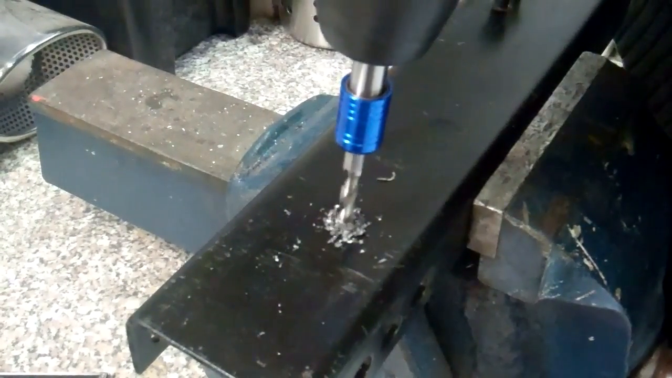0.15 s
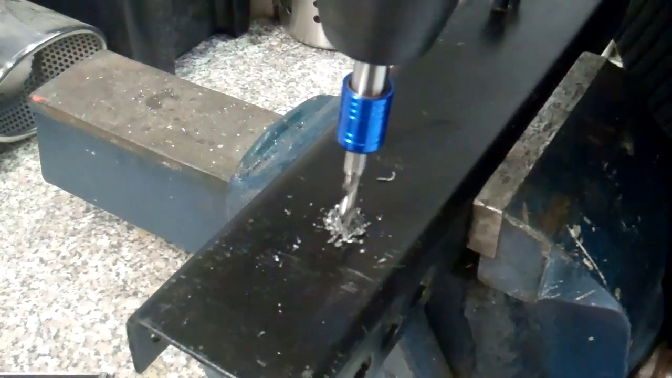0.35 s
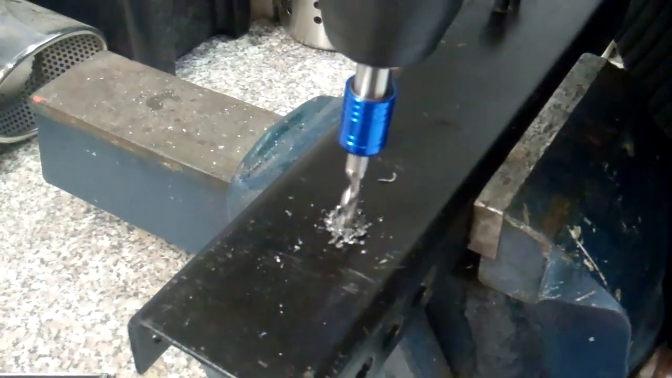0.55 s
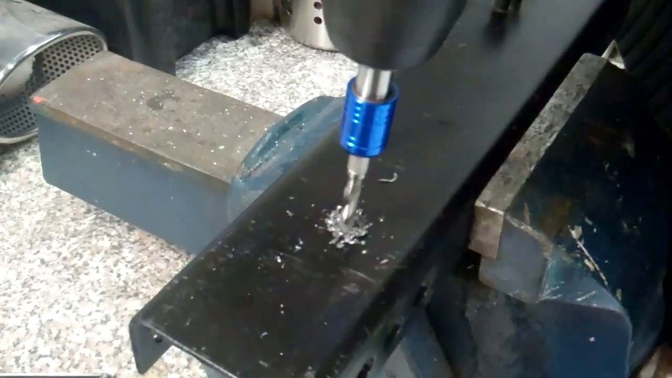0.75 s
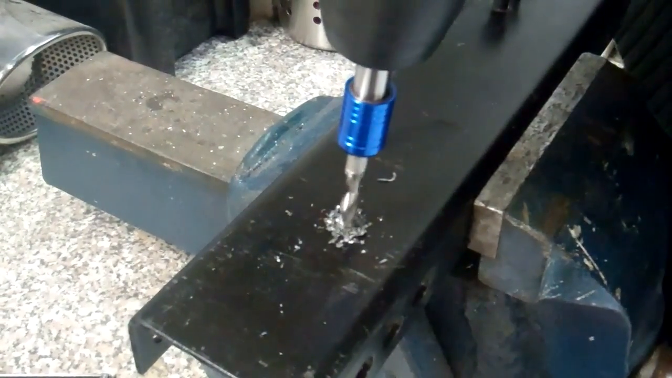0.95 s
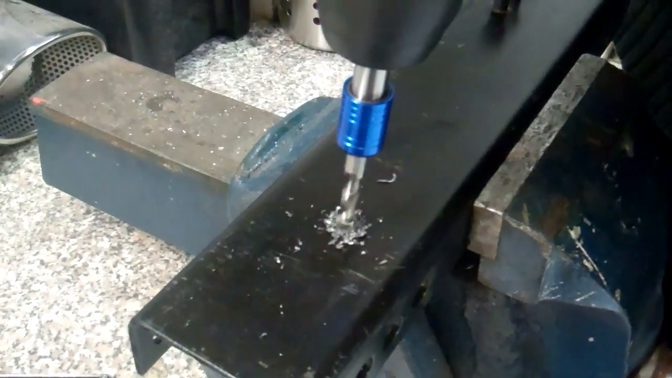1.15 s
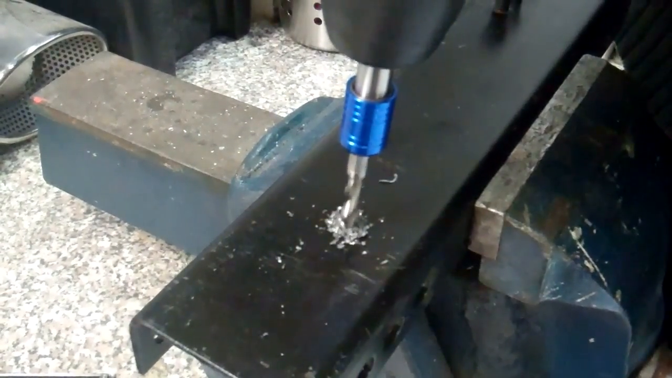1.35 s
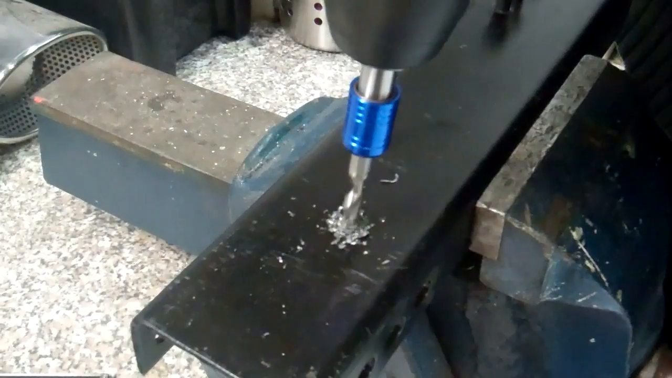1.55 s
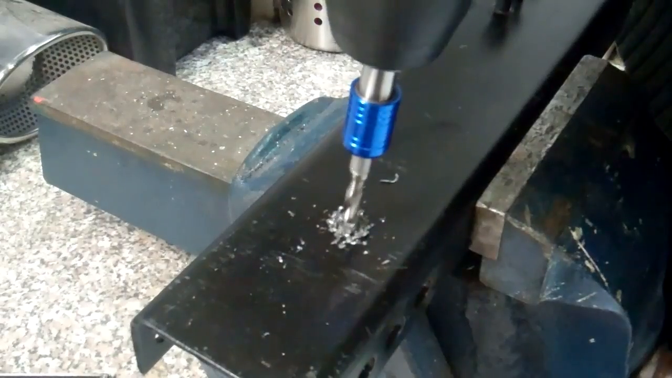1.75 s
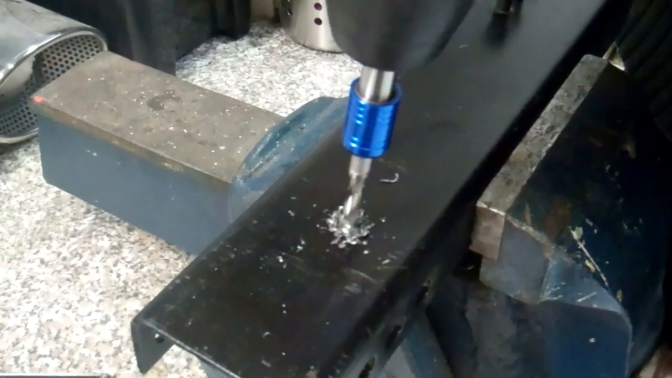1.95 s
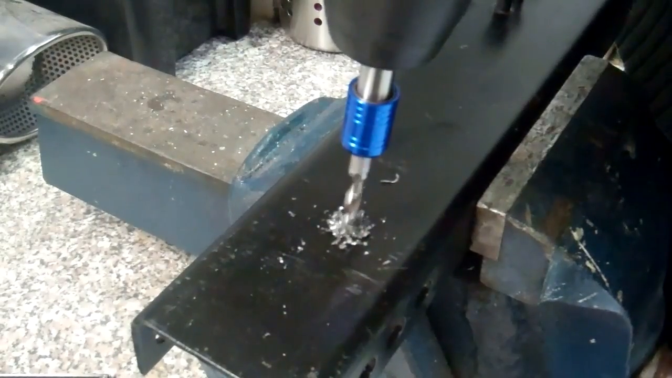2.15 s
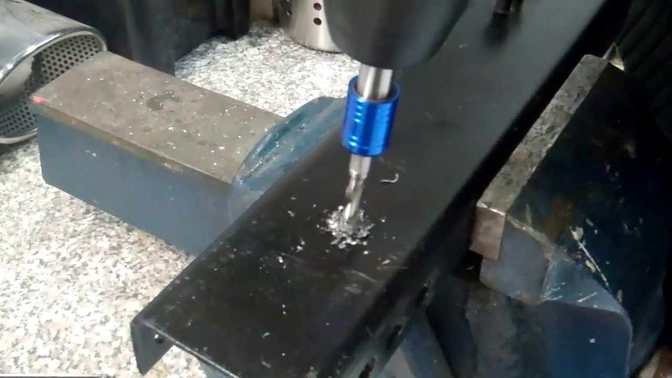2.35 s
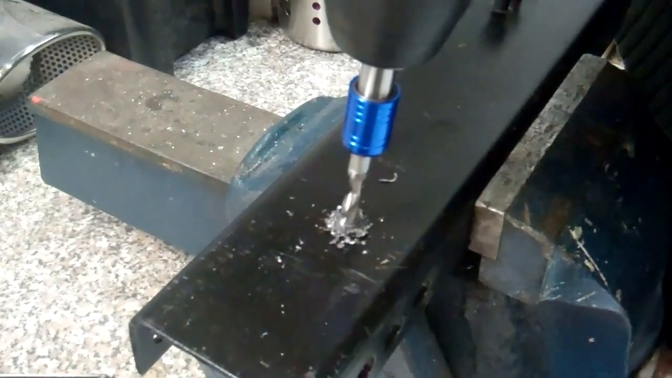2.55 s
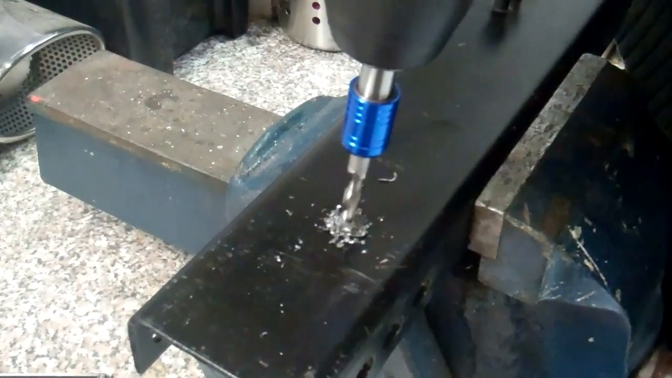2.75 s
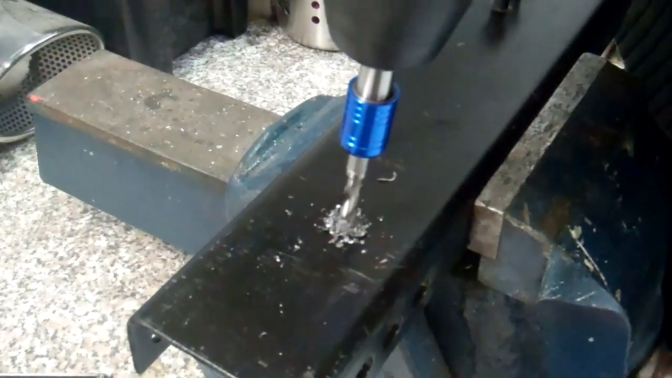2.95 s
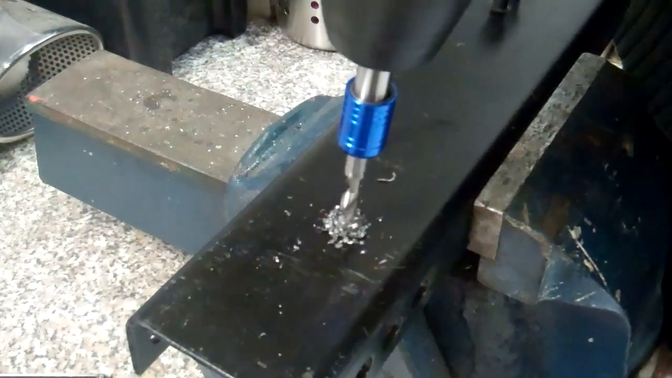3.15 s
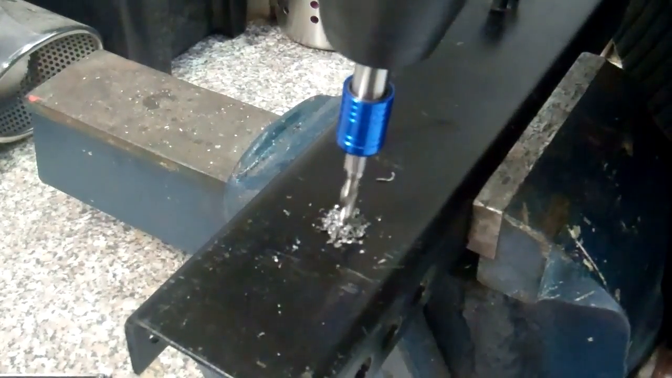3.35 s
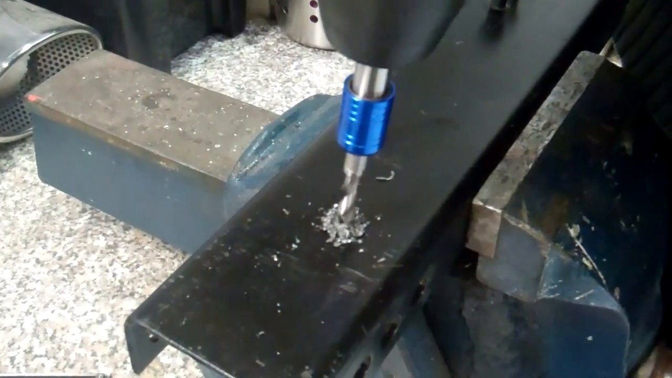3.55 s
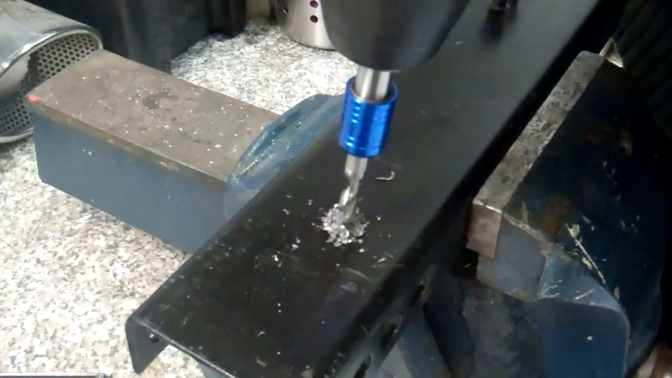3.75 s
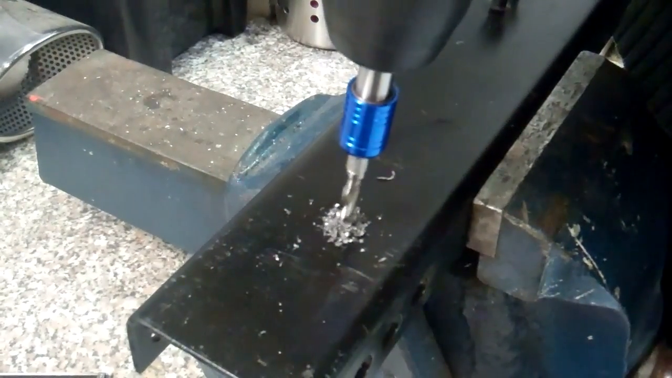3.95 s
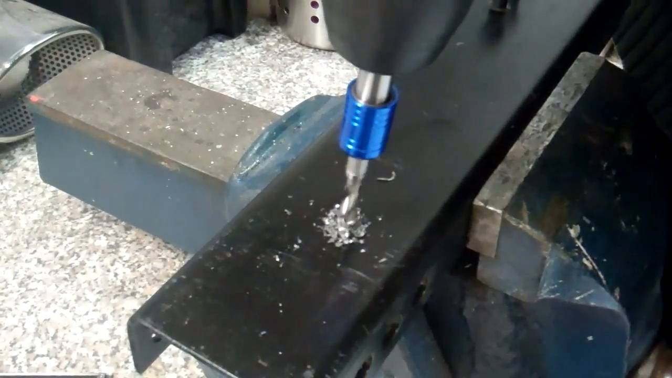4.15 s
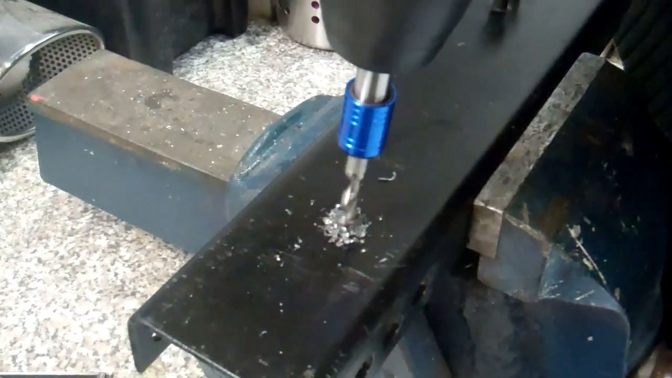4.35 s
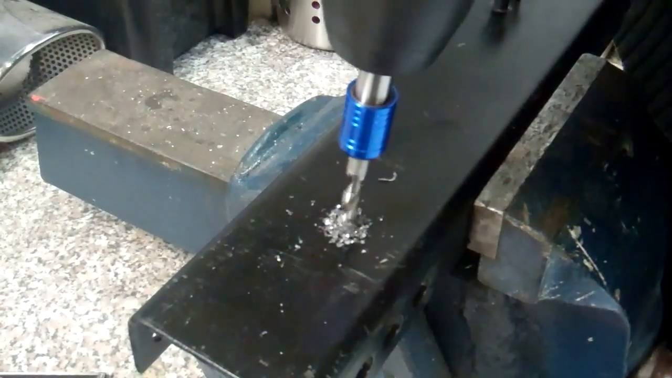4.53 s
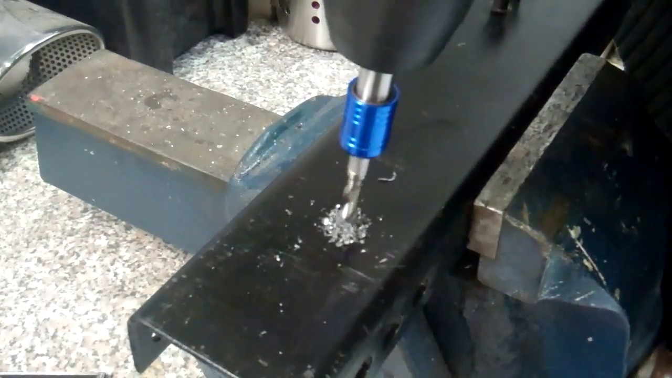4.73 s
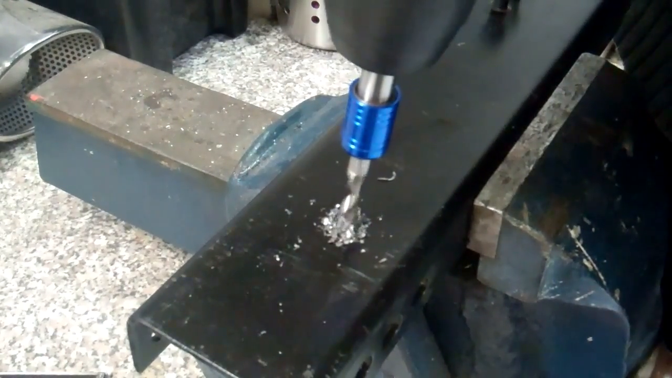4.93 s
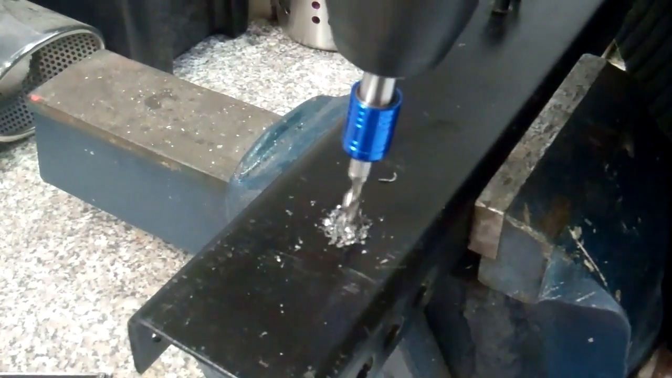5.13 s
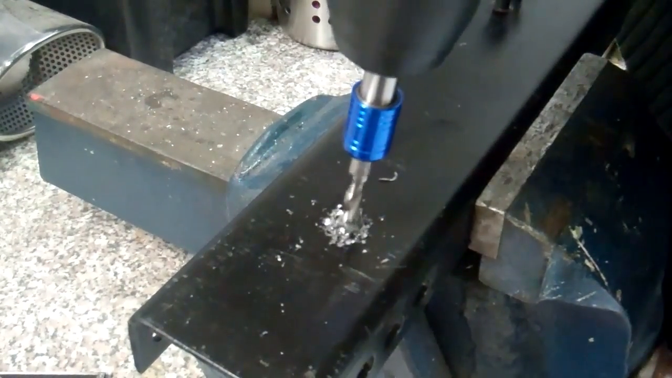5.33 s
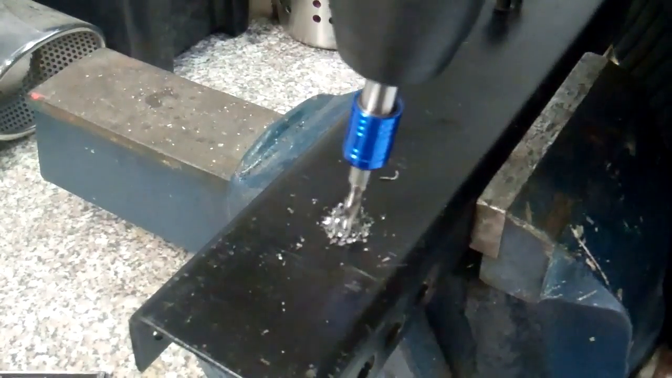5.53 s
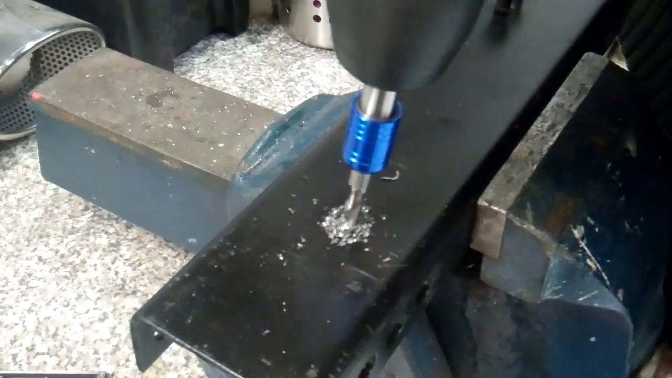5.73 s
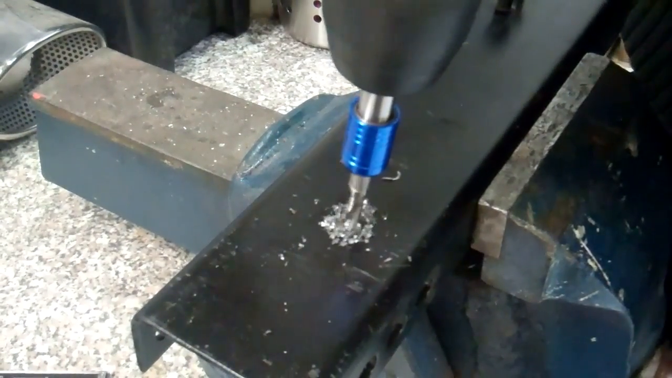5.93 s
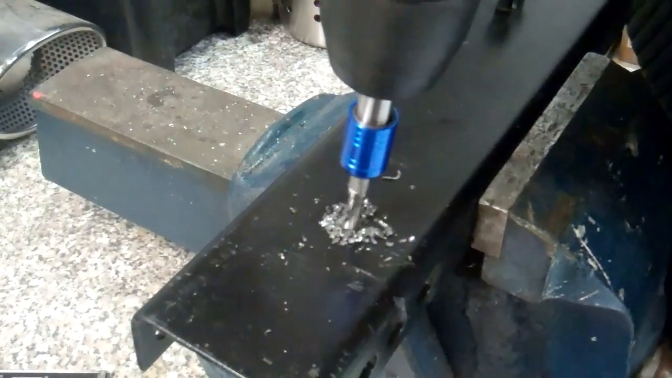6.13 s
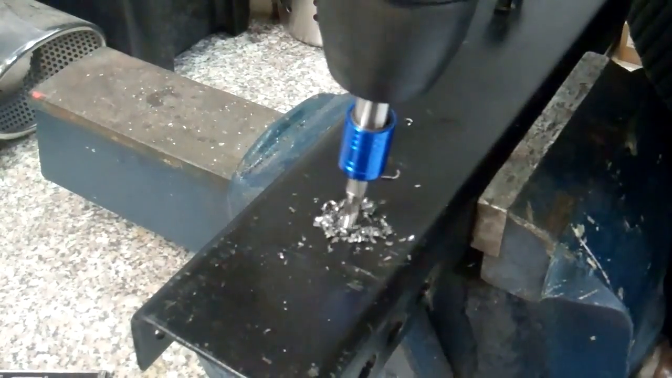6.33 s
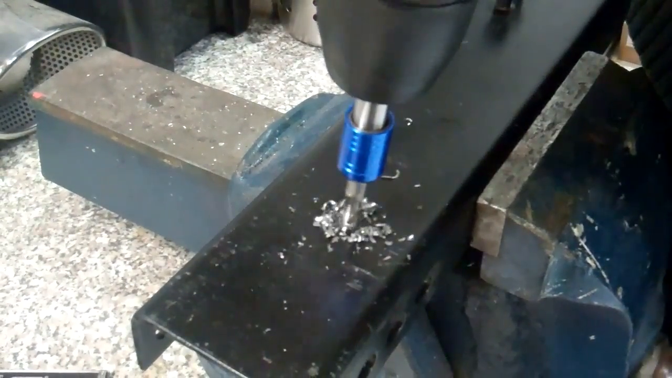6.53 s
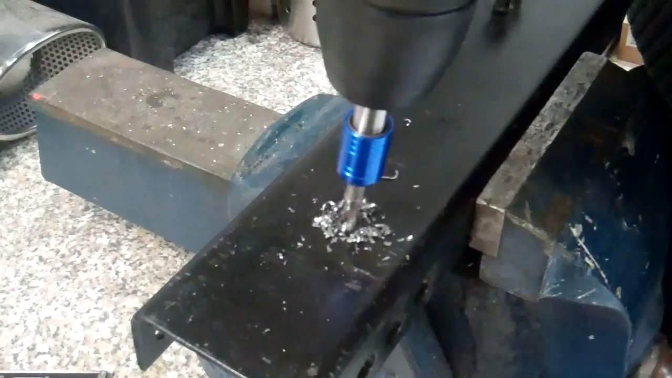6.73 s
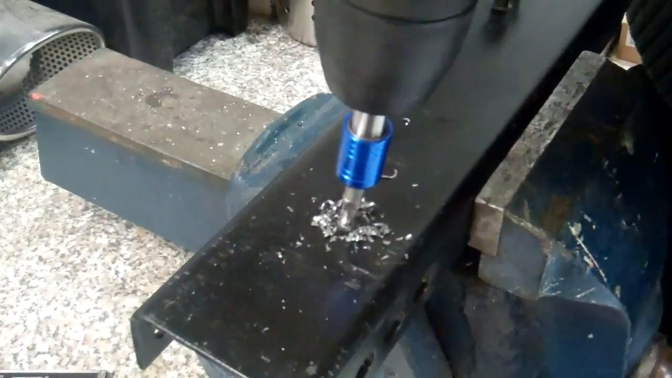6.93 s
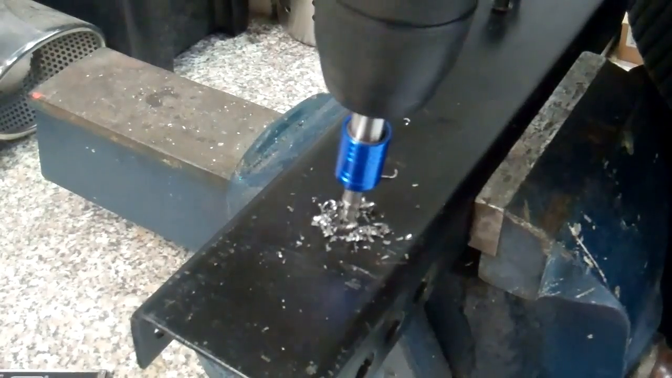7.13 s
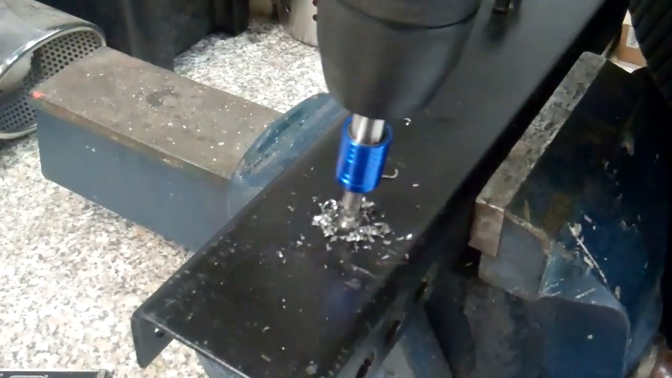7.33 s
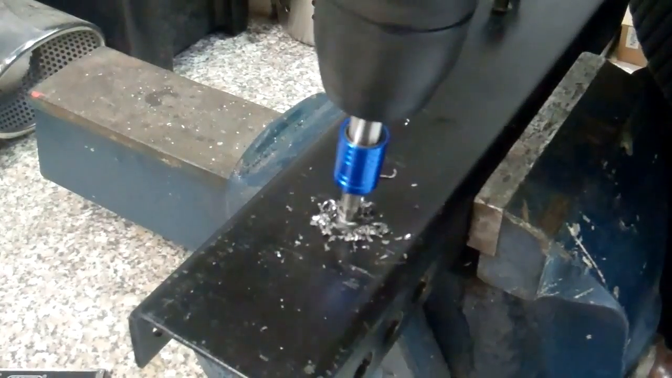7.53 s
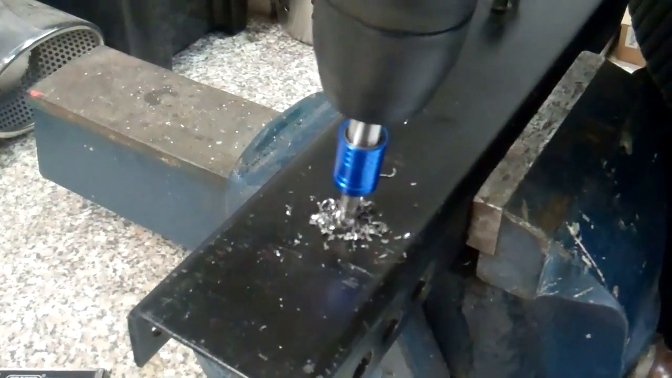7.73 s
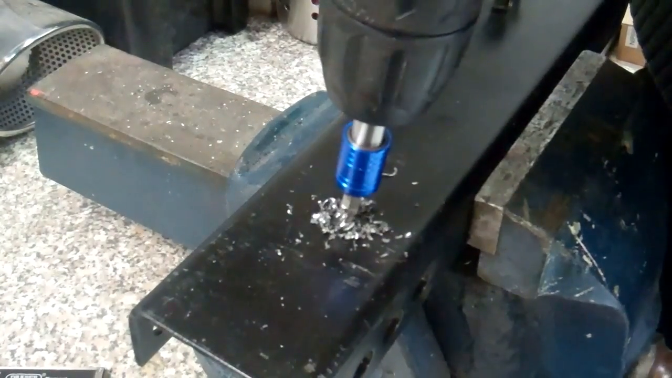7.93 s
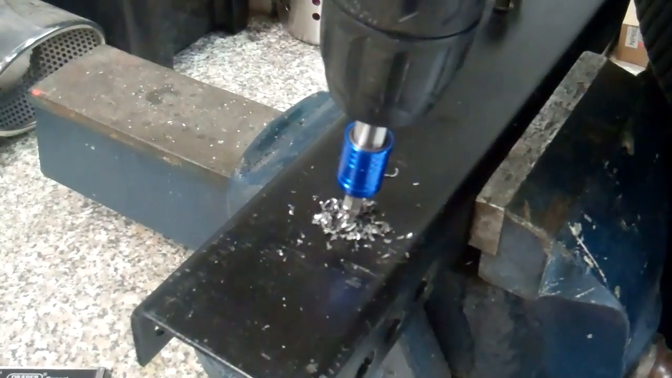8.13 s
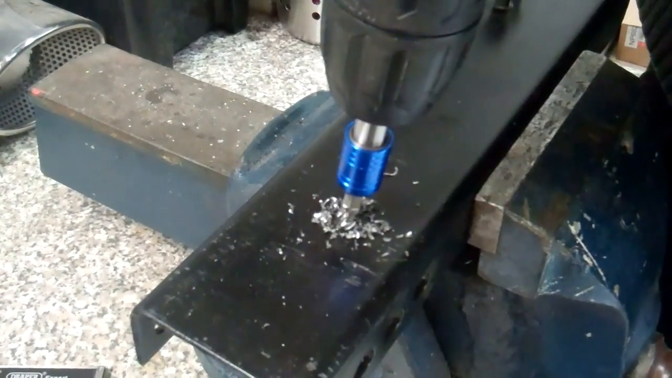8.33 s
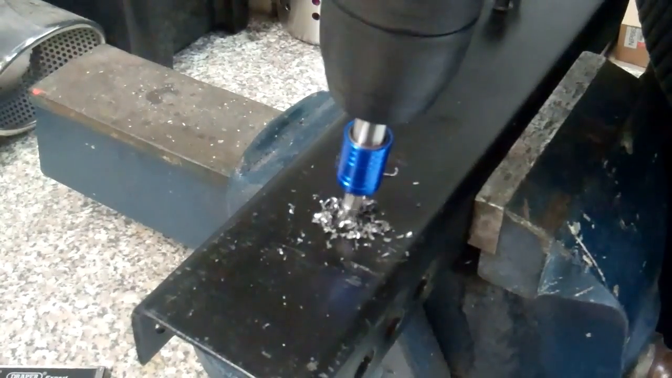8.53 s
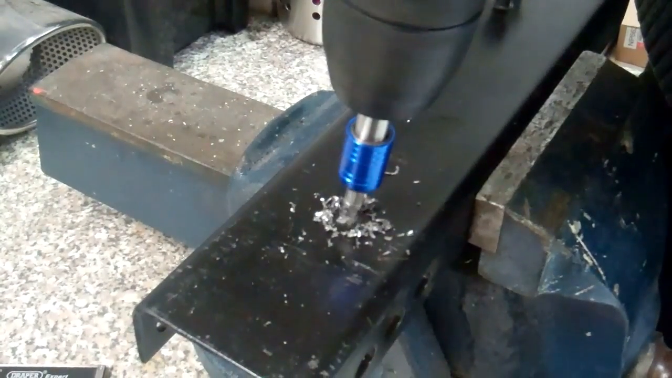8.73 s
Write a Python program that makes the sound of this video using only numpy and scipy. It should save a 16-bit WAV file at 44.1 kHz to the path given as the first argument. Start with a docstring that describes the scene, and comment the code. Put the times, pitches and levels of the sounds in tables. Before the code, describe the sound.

Close up in a workshop, a cordless drill cuts a steel section in a vice. Gear whine, fan rush, gritty cutting and crisp sizzling chips hold steady for five seconds, then the pitch sags and wavers with short squeals. The bit gets through and rubs in slow pulses under a stronger whine. The motor cuts out, a lever snaps in near quiet, and it growls back up. Stereo phone pickup, short reflections.

```python
"""Close to a phone, a cordless drill bores through a steel section held in a vice: motor hum once a turn, gear whine
over the rush of fan and brushes, cutting noise and sizzling swarf; soft jolts ring the bench. As the bit breaks through,
the speed sags and wavers and the second mesh squeals; then the steel is rubbed once a spindle turn. The drill stops,
its reverse lever clicks as the workshop hiss and rumble fade and swell, and it spins up again with growl and groan.
Noises are shaped bands and whines are sines locked to the motor's turning; the phone's two ports hear it in stereo."""
import sys
import numpy as np
from scipy import signal
from scipy.fft import rfft, irfft, next_fast_len
from scipy.io import wavfile
from scipy.ndimage import uniform_filter1d, map_coordinates

SR = 44100
rng = np.random.default_rng(int(sys.argv[2]) if len(sys.argv) > 2 else 0)


def master_out(mix):
    """Clip the mix to full scale and print it as 16-bit PCM to the path in sys.argv[1]."""
    frames = np.transpose(np.atleast_2d(mix))
    ceiling = np.clip(frames, -1, 1)
    pcm = np.round(ceiling * 32767).astype(np.int16)
    wavfile.write(sys.argv[1], SR, pcm)


N = 387198
T = np.arange(N) / SR  # time, s
FFT_SIZE = next_fast_len(N + SR // 4)  # padded so that tails do not wrap round
F = np.maximum(np.arange(FFT_SIZE // 2 + 1) * SR / FFT_SIZE, 1)  # Hz

# Spectra are (frequency [Hz], level [dB per Hz]), relative where the band is later brought to unit level.
# Resonances are (frequency [Hz], width [Hz], gain [dB]).

# the motor under load, before rubs and inertia: (time [s], motor speed [Hz], rush base level [dB])
MOTOR_COURSE = [(0, 325, -39.5), (0.76, 322, -41), (0.98, 322.2, -40), (1.88, 321.6, -40.5),
                (2.0, 318.7, -43.5), (2.6, 320.3, -39), (3.25, 317.6, -40.5), (4.0, 317, -41),
                (4.27, 312.6, -39.5), (4.45, 317.6, -40.5), (5.05, 312, -40.5), (5.3, 304.8, -42),
                (5.4, 297.2, -40), (5.49, 280.5, -41), (5.525, 295, -44), (5.6, 269, -42),
                (5.69, 275.2, -43.5), (5.9, 266, -40), (5.99, 284.7, -41), (6.1, 279, -42.5),
                (6.3, 300.5, -42), (6.44, 308.8, -42.5), (6.53, 324.5, -44), (6.72, 333.4, -43.5),
                (6.9, 337.7, -41.5), (7.15, 333.4, -42), (7.33, 332.6, -41.5), (7.42, 323.3, -42.5),
                (7.51, 318.5, -43), (7.6, 305.8, -43.5), (7.72, 315.4, -43), (7.81, 308.3, -40.5),
                (7.87, 293, -41.5), (7.95, 261, -45.5), (8.53, 60.1, -62), (8.58, 121.7, -43.5),
                (8.6, 146, -39), (8.625, 179, -37.5), (8.645, 197.6, -39), (8.68, 223.9, -38.5),
                (8.72, 233.5, -39), (8.78, 245, -38)]
# stages of the job (boring, boring deeper, breaking through from 5.27 s, rubbing the hole from 6.43 s, losing grip
# from 7.8 s, spinning up from 8.2 s), each held until the next:
# (start [s], cutting base level [dB], chip sizzle base level [dB], unbalance hum [dB],
# first mesh [dB to rush base], second mesh [dB to rush base], first mesh octave [dB to rush base])
JOB_STAGES = [(0, -55, -43, -63, -8, -7.5, -29), (2.4, -52, -43.5, -62.5, -5, -8, -32),
              (4.2, -55.5, -43, -63.5, -7, -7.5, -28), (5.27, -59, -42.5, -73, -20, -12, -30),
              (5.65, -58.5, -56, -77, -12, -7, -29), (6.05, -51, -79, -69.5, -12, -7, -14),
              (6.27, -50.5, -80, -69, -5, -11, -26), (6.43, -48, -85, -68, 4, -16, -25),
              (6.72, -45.5, -86, -62, 1, -17, -22), (7.45, -46.5, -90, -65, 2.5, -23, -8),
              (7.8, -46, -90, -67, -4, -14, -17), (8.2, -49, -77, -74, -26, -27, -11),
              (8.6, -46, -70, -74, -24, -27, -2), (8.65, -51, -60, -70, -20, -27, -7),
              (8.68, -48, -60, -66, -14, -27, 0), (8.72, -46, -64, -62, -8, -37, -9)]
# fan and brush rush, and the drill housing that resonates with it
RUSH_SPECTRUM = [(60, -70), (110, -42), (265, -22.5), (372, -23.5), (490, -14.5), (605, -16.5),
                 (1170, -11.5), (1940, -2.5), (4160, -1), (6630, -4.5), (8540, -3.5), (10500, -11),
                 (11500, -19), (14200, -36)]
HOUSING_MODES = [(1005, 59, 7.5), (2280, 640, -3.5), (3680, 380, 2), (3740, 83, -1.5), (3880, 130, -4),
                 (4240, 200, 5.5), (4430, 350, -7), (7410, 290, 4.5), (8050, 320, -5.5)]
# cutting noise, and the ringing steel section
CUT_SPECTRUM = [(100, -72), (350, -27.5), (460, -8.5), (1400, -5), (3000, -16), (4500, 1), (6000, -8.5),
                (9000, -49), (12000, -58)]
STEEL_MODES = [(965, 147, 8), (3810, 450, 15.5), (5610, 480, 11)]
# scraping, and the bit and chuck that throb harder with each rub
SCRAPE_SPECTRUM = [(300, -44), (700, -7.5), (1500, -5), (3000, -6), (5000, 0), (8000, -27), (11000, -46)]
BIT_MODES = [(2150, 820, 15.5), (3307, 490, 12), (5800, 450, 7), (7370, 500, 5)]
# how hard the bit scrapes: (time [s], level [dB to cutting base])
SCRAPE_COURSE = [(0, 3.5), (5.2, 3), (5.55, 12), (6.1, 9), (6.5, 5), (7.9, 2.5), (8.55, 3), (8.78, -2)]
# side lines of the first mesh: (multiple of motor speed, level [dB to the mesh])
MESH_SIDE_LINES = [(14, -17), (16, -11)]
# fainter gearbox lines that follow the rush: (multiple of motor speed), then (level [dB to rush])
FAINT_GEAR_MULTIPLES = [1.34, 1.555, 2.33, 2.58, 3.25, 6.5, 9.75, 13, 13.5, 19.5]
FAINT_GEAR_DB = [-33.5, -31.5, -28, -27, -26.5, -19.5, -14.5, -26, -28, -14]
# rough gear bands riding on the motor speed: (multiple of motor speed), then (flutter rate [Hz], level [dB to rush])
ROUGH_GEAR_MULTIPLES = [13.03, 13.5, 11.2]
ROUGH_GEAR_BANDS = [(60, -10.5), (70, -16), (90, -15.5)]
# the second mesh squeals as the bit grabs the rim: (start [s], length [s], final level [dB])
RIM_SQUEALS = [(5.31, .07, -42), (5.415, 0.06, -37), (5.52, 0.082, -36.5), (5.62, .05, -45),
               (5.69, 0.099, -39), (5.775, 0.063, -37), (5.85, 0.061, -36), (5.995, 0.14, -33.5),
               (6.18, 0.053, -33), (6.255, 0.037, -33.5), (6.325, 0.016, -37), (6.4, 0.031, -38)]
# the housing groans under a jerk of torque: (start [s], length [s], level [dB])
HOUSING_GROANS = [(7.88, 0.0098, -48.5), (8.548, 0.093, -46)]
GROAN_SPECTRUM = [(250, -39), (480, -15.5), (600, -10), (720, -12), (900, -16), (3000, -61)]
# teeth chattering
RATTLE_SPECTRUM = [(1500, -44), (3000, -6.5), (3800, -2.5), (4400, -4), (5200, -11), (8000, -31.5)]
# swarf off the bit
SIZZLE_SPECTRUM = [(4000, -46), (6500, -16), (8000, 12.5), (10000, -8.5), (12000, -6), (14200, -25)]
# lever, trigger and chuck: (time [s], crack level [dB], body level [dB], 60 dB ring [s]), before shaping
SNAP_TIMES = [(8.2066, -35, -67, .01), (8.2864, -15.5, -18.5, 0.0087), (8.2906, -10, -38, 0.0028),
              (8.518, -56, -47.5, 0.011), (8.548, -30, -32.5, 0.0083), (8.569, -22.5, -50, 0.013)]
# plastic modes, balanced against each other: (frequency [Hz], level [dB])
SNAP_MODES = [(2700, -8), (3350, -9.5), (4300, -10), (6700, -8), (8500, -10)]
# crack, lever resonances and the duller housing knock
CRACK_SPECTRUM = [(800, -22), (2000, -1), (6000, 3.5), (8500, 3.5), (11000, -5.5), (14000, -23)]
LEVER_MODES = [(3000, 1100, -3.5), (5300, 740, -5), (6600, 730, -3), (8500, 900, -3)]
KNOCK_SPECTRUM = [(60, -9), (300, 3), (700, 10), (1500, 1.5), (2500, -9), (5000, -30.5)]
# the bench is jolted: (time [s], level [dB], frequency [Hz], 60 dB ring [s])
BENCH_JOLTS = [(3.42, -57, 129.3, .12), (5.51, -55, 109.9, 0.18), (5.51, -60, 65, 0.33),
               (5.54, -51, 170, 0.094), (5.62, -61, 127, 0.47)]
# the background fades and swells back while the motor rests:
# (time [s], hiss level [dB], low hiss level [dB], rumble level [dB])
BACKGROUND_COURSE = [(0, -80, -76, -80.5), (7.6, -74, -79, -80.5), (7.9, -47, -59.5, -76),
                     (7.96, -69, -71, -81), (8.025, -76, -81, -81), (8.08, -67.5, -68, -74),
                     (8.28, -59, -63, -60), (8.31, -68, -82, -87), (8.37, -76, -92, -94),
                     (8.44, -83, -93, -92), (8.49, -75, -74, -80), (8.53, -63, -71, -71),
                     (8.78, -62, -68, -73)]
# distant workshop air
HISS_SPECTRUM = [(1200, -47), (2000, -9.5), (4200, -11), (8700, -18.5), (14000, -32)]
LOW_HISS_SPECTRUM = [(150, -50.5), (300, -12), (1600, -19.5), (2400, -42)]
RUMBLE_SPECTRUM = [(20, 3), (50, -5.5), (100, -6.5), (170, -2.5), (260, -7.5), (400, -67)]
# the two microphone ports: (frequency [Hz], left minus right [dB])
PORT_SHADING = [(40, -2.5), (200, -2), (2250, -0.5), (4120, -1.5), (6000, -1.5), (8500, 9), (12000, 0.5)]
# (frequency [Hz], phase by which left leads [rad])
PORT_LEAD = [(2600, 0.18), (4100, 0.5), (6900, 0.5), (9700, -1.5), (13500, -3)]
# scatter from bench and walls: (frequency [Hz], level [dB to direct])
SCATTER_SPECTRUM = [(60, 0), (130, -10.5), (280, -1.5), (620, -18), (1340, -14), (2920, -16.5), (6340, -5),
                    (13800, -5)]
# the drill leans as it breaks through: (time [s], left minus right [dB])
LEAN_COURSE = [(0, 0), (5.4, 0), (5.7, -0.4), (8.78, -0.3)]

FIRST_MESH, SECOND_MESH, MESH_OCTAVE, PLANET = 15, 12.6, 30, .777  # multiples of motor speed
GEARING = 54.2  # motor turns per spindle turn
THROUGH_S, RUB_S = 6.45, 6.91  # the bit is through; the moment of one rub
EASE_S = 7.4  # the feed eases and the rub no longer drags the motor
RUB_DB, RUB_RUSH_DB, RUB_SAG_HZ, SAG_LAG_RAD = 3.5, 2, 4.19, 1.204
RELEASE_S, PULL_S = 7.893, 8.548  # the trigger is let go and pulled again
BRAKE_DB_PER_S, START_DB_PER_S = 901, 4000
BLEND_S, CHATTER_LAG_S, CHIPS_FADE_S = 0.037, 0.15, .25
SQUEAL_SWELL_DB, SQUEAL_EDGE_DB_PER_S = 2, 1199
GROAN_RISE_DB_PER_S, GROAN_FALL_DB_PER_S = 596, 103
THIRD_DB = -11  # third multiple of the second mesh after the pull, dB to rush
GROWL_HZ, GROWL_HZ_PER_S, GROWL_S, GROWL_DB = 500, 2900, 0.086, -43.5
SNAP_SCATTER_DB, SNAP_NOISE_DB = 1.5, -7
MAINS_HZ, MAINS_DB = 150, -1.8  # dB to rumble
ROOM_T60_S = 0.053
GEAR_SCATTER_DB = -7  # the gearbox is close: its whines scatter less
TOP_HZ = 14200


def drill():
    """Noises (direct, left scatter, right scatter), tones locked to the motor's turning, and the chip gain."""
    hz, rush_db = curves(MOTOR_COURSE)
    cut_db, chips_db, hum_db, first_db, second_db, octave_db = stages()
    on_db = np.maximum(BRAKE_DB_PER_S * (RELEASE_S - T), START_DB_PER_S * (T - PULL_S))
    on = undb(np.clip(on_db, -90, 0))
    rub, turn = turning(hz)

    first_db, octave_db = first_db + rush_db, octave_db + rush_db
    squeal_db = bursts(RIM_SQUEALS, SQUEAL_EDGE_DB_PER_S, SQUEAL_EDGE_DB_PER_S, SQUEAL_SWELL_DB)
    second_db = np.maximum(second_db + rush_db, squeal_db)
    rush_db = rush_db + RUB_RUSH_DB * rub
    load = undb(2.0 * walk(110))  # the loaded mesh grips and slips

    noise = rush_and_cutting(turn, rub, rush_db, cut_db)
    tones = gear_lines(turn, load, rush_db, hum_db, first_db, second_db, octave_db)
    tones += growl() + groan() + rattle(load, second_db)
    chip_gain = undb(uniform_filter1d(chips_db, int(CHIPS_FADE_S * SR)))
    return on * noise, on * tones, on * chip_gain


def turning(hz):
    """Rub cycle (-1 to 1) and motor angle [rad]: each rub drags the motor, whose inertia smooths the speed."""
    spindle = 2 * np.pi * np.cumsum(hz) / SR / GEARING
    spindle -= spindle[int(RUB_S * SR)]
    rubbing = (T > THROUGH_S) & (T < RELEASE_S)
    hz = hz - RUB_SAG_HZ * np.cos(spindle - SAG_LAG_RAD) * rubbing * (T < EASE_S)
    hz = uniform_filter1d(hz, size=SR // 60)
    waver = 0.0007 * walk(40) + .002 * walk(14) + .002 * walk(5) * (T < 5.2)
    turn = 2 * np.pi * np.cumsum(hz * (1 + waver)) / SR
    return np.cos(spindle) * rubbing, turn


def rush_and_cutting(turn, rub, rush_db, cut_db):
    """Three unrelated copies of gritty noise through housing, steel and bit, whose resonances slide."""
    # planet gears beat the rush a little on every pass
    beat = 1 + 0.2 * np.cos(PLANET * turn) + 0.11 * np.cos(2 * PLANET * turn)
    rush_level = rush_db + 4.0 + 0.59 * walk(12)
    steel_level = cut_db + 8.0 + 1.7 * walk(30) + 0.3 * walk(2.936)
    scrape_level = cut_db + RUB_DB * rub + curves(SCRAPE_COURSE)[0] + 0.87 * walk(30)
    # (gate, spectrum, resonances, size scatter dB, level dB)
    layers = [(beat, RUSH_SPECTRUM, HOUSING_MODES, 1.55, rush_level),
              (1, CUT_SPECTRUM, STEEL_MODES, 1.5, steel_level),
              (1, SCRAPE_SPECTRUM, BIT_MODES, 1.8, scrape_level)]
    drifts = [share * walk(5) for share in (.004, .018, .018)]  # grip and pressure shift the resonances
    copies = []
    for _ in range(3):
        copy = np.zeros(N)
        for (gate, band, modes, scatter_db, db), drift in zip(layers, drifts):
            shaped = unit(colour(grit(scatter_db) * gate, band, modes))
            copy += wander(shaped, drift) * undb(db)
        copies.append(copy)
    return np.array(copies)


def gear_lines(turn, load, rush_db, hum_db, first_db, second_db, octave_db):
    """Unbalance hums once a turn and gear meshes whine at multiples of the motor speed, flickering in level."""
    def line(multiple, db, flicker_db):
        """A flickering sine at a multiple of the motor speed."""
        level = np.sqrt(2) * undb(db + flicker_db * walk(25))
        return level * np.sin(multiple * turn + 2 * np.pi * rng.random())

    tones = line(1, hum_db, .8)
    tones += np.sqrt(load) * line(FIRST_MESH, first_db, .7)
    tones += load * line(SECOND_MESH, second_db, 1.2)
    tones += load * undb(2.5 * walk(200)) * line(MESH_OCTAVE, octave_db, 1.)
    for multiple, db in MESH_SIDE_LINES:
        tones += line(multiple, first_db + db, 3.)
    for multiple, db in zip(FAINT_GEAR_MULTIPLES, FAINT_GEAR_DB):
        tones += line(multiple, rush_db + db, 3.)
    for multiple, (rate, db) in zip(ROUGH_GEAR_MULTIPLES, ROUGH_GEAR_BANDS):
        band = walk(rate) * np.sin(multiple * turn) + walk(rate) * np.cos(multiple * turn)
        tones += undb(rush_db + db) * band * (T < RELEASE_S)
    tones += load * line(3 * SECOND_MESH, rush_db + THIRD_DB, 2.) * (T > PULL_S)
    return tones


def growl():
    """The stalled windings growl, rising in pitch as the rotor frees itself."""
    since = T - PULL_S
    hz = GROWL_HZ + GROWL_HZ_PER_S * np.clip(since, 0, 1)
    phase = 2 * np.pi * np.cumsum(hz * (1 + 0.0315 * walk(80))) / SR
    level_db = GROWL_DB + 3.5 * walk(70) - 1000 * np.maximum(since - GROWL_S, 0)
    return undb(level_db) * np.sin(phase) * (since > 0)


def groan():
    """The housing groans under jerks of torque: short bursts of band noise."""
    level_db = bursts(HOUSING_GROANS, GROAN_RISE_DB_PER_S, GROAN_FALL_DB_PER_S, 0)
    return unit(colour(grit(1.44), GROAN_SPECTRUM)) * undb(level_db)


def rattle(load, second_db):
    """Teeth chatter around the second mesh's whine, slower to come and go."""
    chatter_db = uniform_filter1d(second_db, int(CHATTER_LAG_S * SR))
    return unit(colour(grit(2.5) * load, RATTLE_SPECTRUM)) * undb(chatter_db + 2.0)


def chips(gain):
    """Swarf sizzles off the bit as gritty noise, nearer the left port."""
    shared, own = (unit(colour(grit(1.83), SIZZLE_SPECTRUM)) for _ in range(2))
    right = undb(-5.5) * shared + undb(-12.0) * own
    return gain * undb(1.55 * walk(22.27)) * np.array([shared, right])


def clicks():
    """Plastic snaps: struck modes with a noisy crack, and a duller knock of the housing."""
    crack, knock = np.zeros(N), np.zeros(N)
    t = T[:SR // 10]
    hz, mode_db = np.transpose(SNAP_MODES)
    for s, db, body_db, ring in SNAP_TIMES:
        i = int(s * SR)
        noise = rng.standard_normal(len(t))
        gain = undb(mode_db + SNAP_SCATTER_DB * rng.standard_normal(len(hz)))
        phase = 2 * np.pi * rng.random((len(hz), 1))
        modes = gain / np.sqrt(np.sum(gain ** 2)) @ np.sin(2 * np.pi * np.outer(hz, t) + phase)
        strike = (1 - np.exp(-t / 0.00016)) * 1000. ** (-t / max(ring, .002))
        tail = undb(-29) * 1000. ** (-t / 0.052)
        crack[i:i + len(t)] += undb(db) * (modes * strike + noise * (undb(SNAP_NOISE_DB) * strike + tail))
        knock[i:i + len(t)] += undb(body_db) * noise * (strike + tail)
    return colour(crack, CRACK_SPECTRUM, LEVER_MODES) + colour(knock, KNOCK_SPECTRUM)


def thumps():
    """Low decaying rings of the bench after a soft push."""
    out = np.zeros(N)
    for s, db, hz, ring in BENCH_JOLTS:
        t = np.maximum(T - s, 0)
        envelope = (1 - np.exp(-t / 0.0055)) * 1000. ** (-t / ring)
        out += undb(db) * np.sin(2 * np.pi * hz * t) * envelope
    return out


def workshop():
    """Distant hiss with a wavering mains tone, and three unrelated copies of low rumble."""
    hiss_db, low_db, rumble_db = curves(BACKGROUND_COURSE)
    near = np.zeros(N)
    for band, db in [(HISS_SPECTRUM, hiss_db), (LOW_HISS_SPECTRUM, low_db)]:
        near += unit(colour(rng.standard_normal(N), band)) * undb(db + 2.4 * walk(50))
    rumble = np.array([unit(colour(rng.standard_normal(N), RUMBLE_SPECTRUM)) for _ in range(3)])
    rumble *= undb(1.7 * walk(8))
    buzz = undb(MAINS_DB + 1.5 * walk(6.2)) * np.sin(2 * np.pi * MAINS_HZ * T)
    return near + buzz * undb(rumble_db), rumble * undb(rumble_db)


def undb(db):
    """Amplitude from dB."""
    return 10 ** (np.asarray(db) / 20)


def unit(x):
    """Scales x to an rms of one."""
    return x / np.sqrt(np.mean(x ** 2))


def curves(table):
    """Columns of a table, joined in time."""
    s, *columns = np.transpose(table)
    return [np.interp(T, s, c) for c in columns]


def stages():
    """Stage columns held in time, with short blends."""
    s, *columns = np.transpose(JOB_STAGES)
    now = np.searchsorted(s, T, side="right") - 1
    return [uniform_filter1d(c[now], int(BLEND_S * SR)) for c in columns]


def bursts(table, rise, fall, swell_db):
    """Level in dB of the loudest burst: each rises, swells while held, and falls (dB per s)."""
    levels = []
    for s, length, db in table:
        swell = swell_db * (np.clip((T - s) / length, 0, 1) - 1)
        levels.append(db + swell - rise * np.maximum(s - T, 0) - fall * np.maximum(T - s - length, 0))
    return np.max(levels, axis=0)


def over_hz(table):
    """A spectrum table, joined on a log-frequency axis."""
    hz, value = np.transpose(table)
    return np.interp(np.log(F), np.log(hz), value)


def colour(x, spectrum, modes=()):
    """Shapes x by a smooth spectrum with resonant humps."""
    db = over_hz(spectrum)
    for hz, width, gain_db in modes:
        db = db + gain_db / (1 + (2 * (F - hz) / width) ** 2)
    return irfft(rfft(x, FFT_SIZE) * undb(db), FFT_SIZE)[:N]


def walk(rate):
    """Random levels held 1 / rate s and slewed twice, with an rms of one."""
    k = int(SR / rate)
    held = np.repeat(rng.standard_normal(N // k + 1), k)
    return unit(uniform_filter1d(uniform_filter1d(held, k), k)[:N])


def grit(scatter_db):
    """Noise whose samples scatter in size, like chips and brush sparks."""
    return rng.standard_normal(N) * undb(scatter_db * rng.exponential(size=N))


def wander(x, drift):
    """Plays x a little faster or slower, so that its resonances slide."""
    return map_coordinates(x, [np.arange(N) + np.cumsum(drift)], order=3, mode="mirror")


def scene():
    """Both ports get the direct sound with their own shading, plus unrelated scatter from bench and walls."""
    noise, tones, chip_gain = drill()
    shop, rumble = workshop()
    noise = rfft(noise + rumble, FFT_SIZE)
    near = rfft(clicks() + thumps() + shop, FFT_SIZE)
    gears = rfft(tones, FFT_SIZE)

    t = T[:SR // 5]
    tails = rng.standard_normal((2, len(t))) * 1000. ** (-t / ROOM_T60_S)
    tails /= np.sqrt(np.sum(tails ** 2, axis=1, keepdims=True))
    wet = undb(over_hz(SCATTER_SPECTRUM))
    scatter = noise[1:] + (near + undb(GEAR_SCATTER_DB) * gears) * rfft(tails, FFT_SIZE)
    heard = (noise[0] + near + gears + wet * scatter) / np.sqrt(1 + wet ** 2)

    side = np.array([[.5], [-.5]])  # left, right
    ports = undb(side * over_hz(PORT_SHADING)) * np.exp(1j * side * over_hz(PORT_LEAD))
    stereo = irfft(heard * ports, FFT_SIZE)[:, :N]
    return stereo * undb(side * curves(LEAN_COURSE)[0]) + chips(chip_gain)


def record(dry):
    """The phone cuts the top with a steep low-pass."""
    return signal.sosfilt(signal.ellip(10, .2, 70, TOP_HZ, fs=SR, output="sos"), dry)


dry = scene()
out = record(dry)
master_out(out)
```